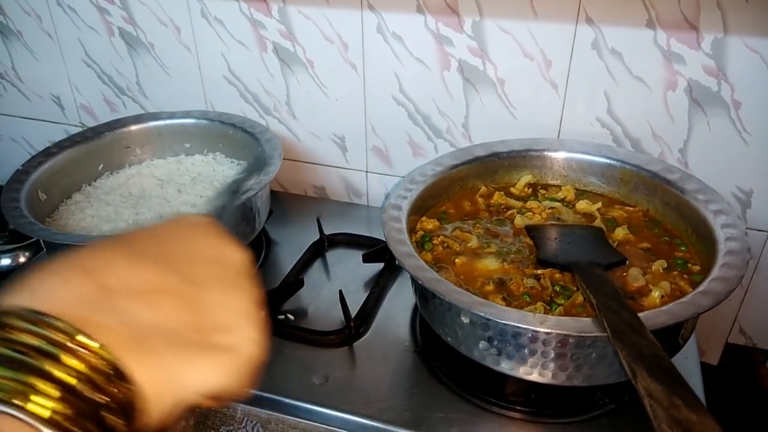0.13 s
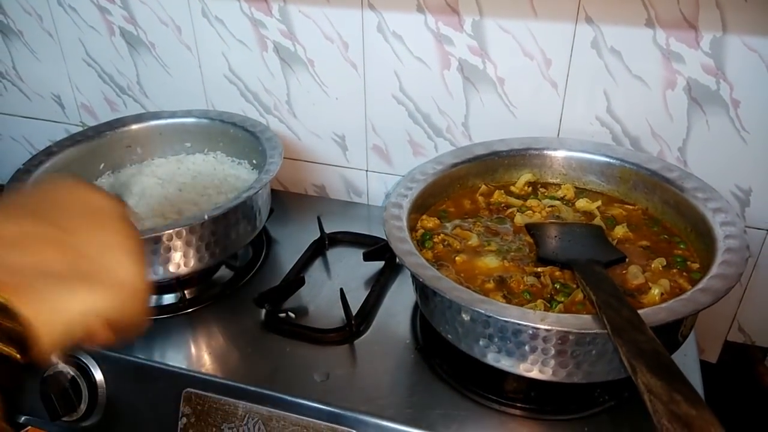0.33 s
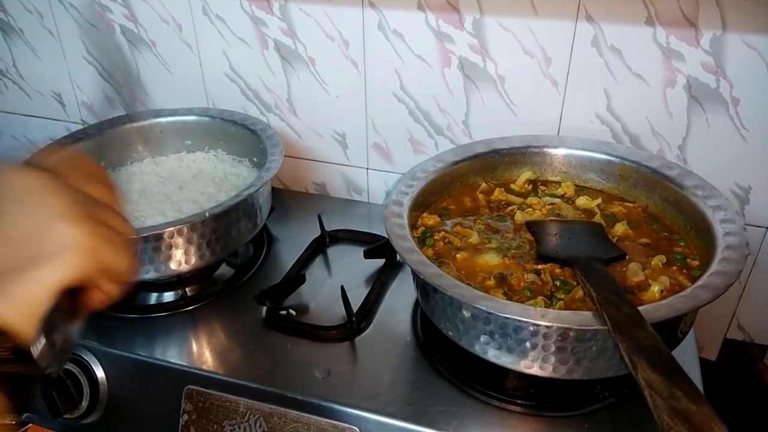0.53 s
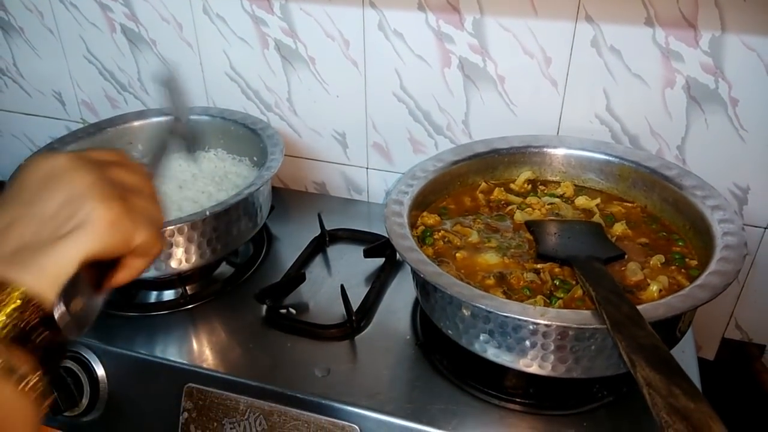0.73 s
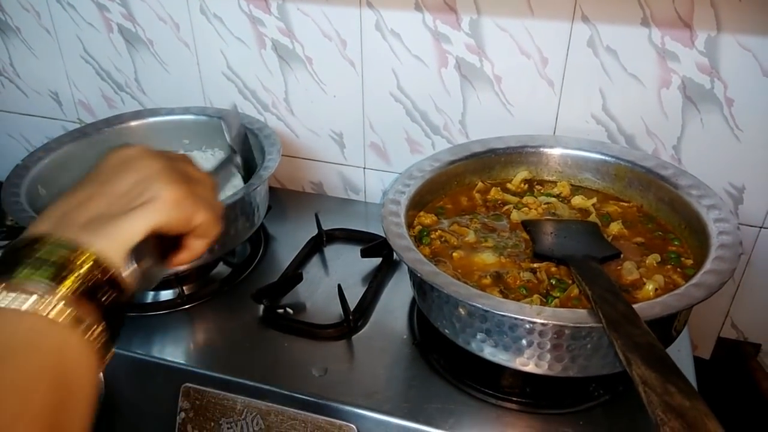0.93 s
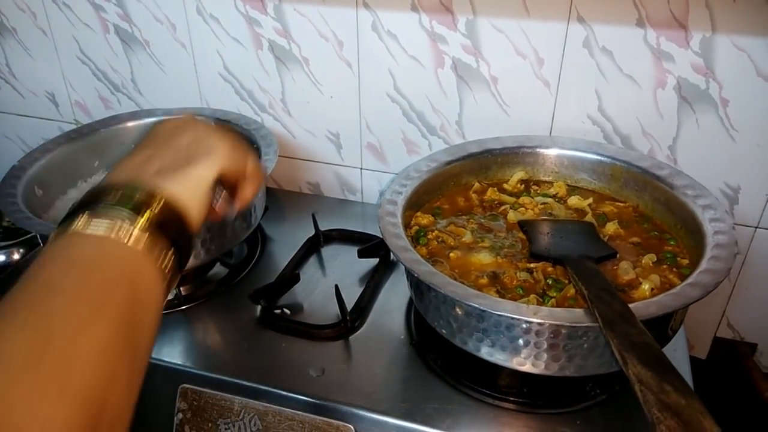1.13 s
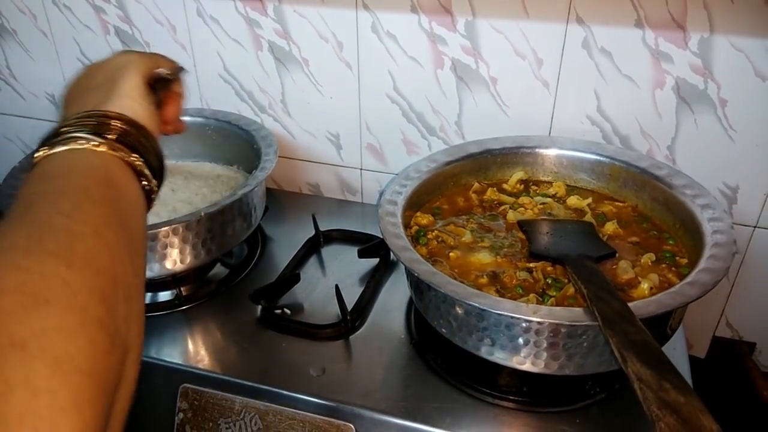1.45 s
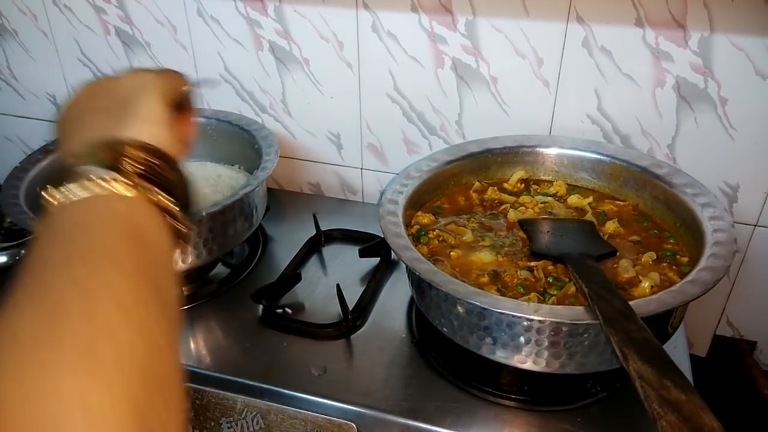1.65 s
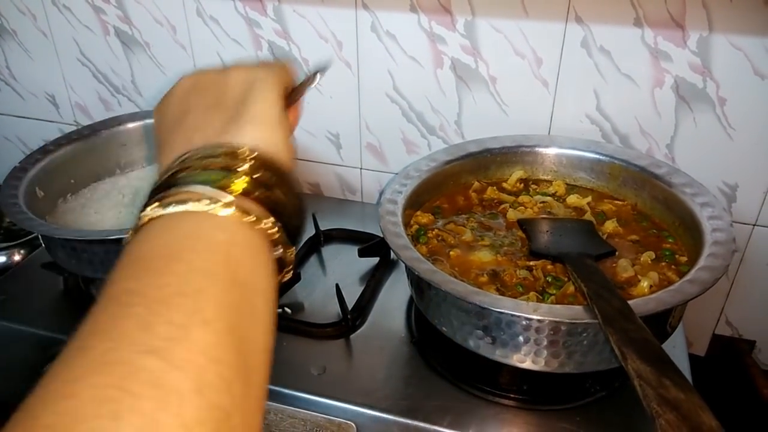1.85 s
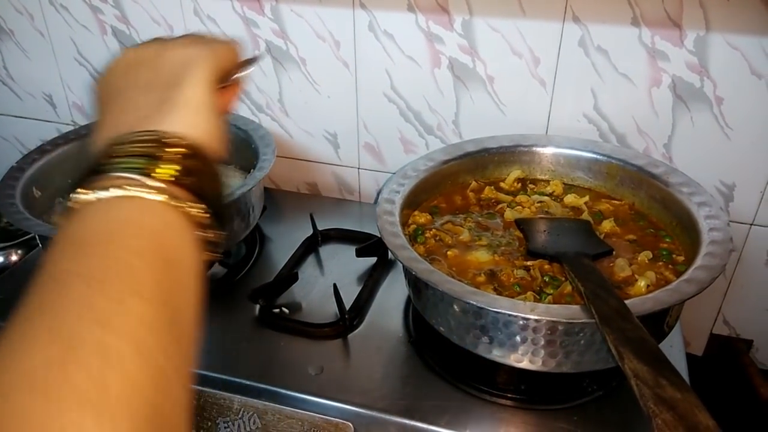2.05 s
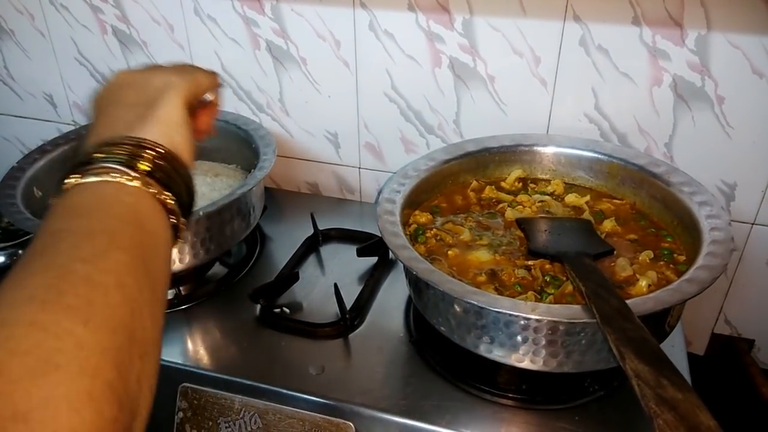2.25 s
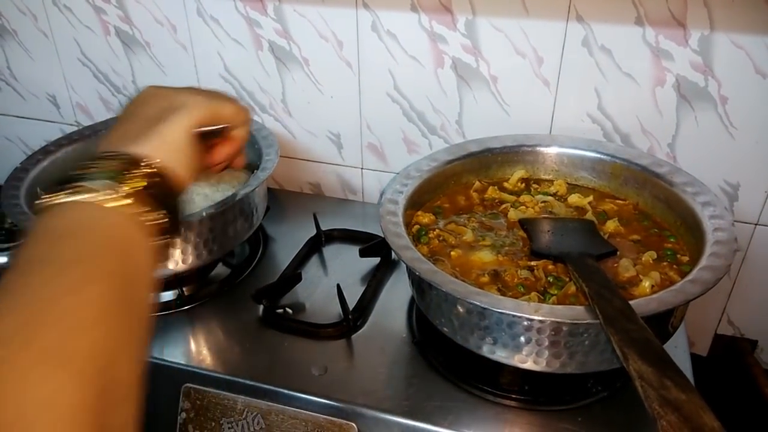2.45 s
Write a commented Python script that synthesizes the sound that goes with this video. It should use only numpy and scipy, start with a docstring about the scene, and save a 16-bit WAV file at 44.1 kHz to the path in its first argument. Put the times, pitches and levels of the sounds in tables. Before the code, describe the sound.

Close stereo pickup of a steel spoon striking and scraping a rice pot on a stove, the wall singing briefly, with soft hiss on the right and a short, bright tiled-room tail.

```python
"""In a tiled kitchen, a metal spoon stirs cooked rice in a steel pot on a stove, heard close up.
It knocks on the pot (bursts of decaying modes), scrapes through the rice along the wall (random
slips driving resonances) and now and then makes the wall sing (swelling, wavering tones).
Hollow groans are narrow noise bands, and bangles clink briefly near the start. A hiss on the right,
faint room noise and a faint whistle lie behind; decaying noise gives the tiles' short tail."""
import sys
import numpy as np
from scipy import signal
from scipy.fft import rfft, irfft
from scipy.io import wavfile
from scipy.ndimage import uniform_filter1d

SR = 44100
rng = np.random.default_rng(int(sys.argv[2]) if len(sys.argv) > 2 else 0)


def wav_out(sig):
    """Save sig, one row per channel (or a flat mono array), as 16-bit PCM at SR to the path in sys.argv[1]."""
    wavfile.write(sys.argv[1], SR, np.round(np.clip(np.atleast_2d(sig).T, -1, 1) * 32767).astype(np.int16))


N = 114660  # length in samples


def amp(db):
    """Level law: decibels become an amplitude ratio."""
    return 10 ** (np.asarray(db) / 20)


def unit(x):
    """Normalization: the signal is scaled to rms 1."""
    return x / np.sqrt(np.mean(x ** 2) + 1e-20)


def read(points, hz):
    """Logarithmic frequency scale: a table is interpolated evenly in log frequency."""
    f, value = np.transpose(points)
    return np.interp(np.log(hz + 1), np.log(f + 1), value)


def add(mix, start_s, sound):
    """Superposition: a sound is added to the mix from its start time."""
    part = mix[:, round(start_s * SR):][:, :sound.shape[1]]
    part += sound[:, :part.shape[1]]


def drift(seconds):
    """Low-pass noise: a Gaussian filter leaves a slow random wander of rms 1."""
    f = np.fft.rfftfreq(N, 1 / SR)
    return unit(irfft(rfft(rng.standard_normal(N)) * np.exp(-(f * seconds) ** 2), N))


def rising(sound, seconds):
    """Exponential build-up: the start is softened with this time constant."""
    return sound * (1 - np.exp(-np.arange(sound.shape[1]) / SR / seconds))


# Correlation of the two channels' noise. Each row: frequency in Hz, correlation from 0 to 1.
LIKENESS = [(100, 0.9), (300, 0.86), (700, 0.44), (1500, 0.11), (3000, 0)]


def noise(size=N):
    """Interchannel coherence: white stereo noise shares its bass and differs in its treble."""
    left, other = rfft(rng.standard_normal((2, size)))
    same = np.clip(read(LIKENESS, np.fft.rfftfreq(size, 1 / SR)), -1, 1)
    right = same * left + np.sqrt(1 - same ** 2) * other
    return irfft([left, right], size)


def steady(colour):
    """Spectral shaping: white stereo noise is filtered to a colour and scaled to rms 1."""
    gain = amp(read(colour, np.fft.rfftfreq(N, 1 / SR)))
    return unit(irfft(rfft(noise()) * gain, N))


PATCH_HZ, PATCH_S = 220, 0.027  # smoothing lengths of the random gain in frequency and time


def patchy(x, depth_db):
    """Time-varying filtering: a smooth random gain favours now some pitches, now others."""
    z = signal.stft(x, SR, nperseg=512, noverlap=384)[2]
    field = rng.standard_normal(z.shape[1:])
    bins = max(1, round(PATCH_HZ * 512 / SR))
    frames = max(1, round(PATCH_S * SR / 128))
    for _ in range(2):
        field = uniform_filter1d(uniform_filter1d(field, bins, 0), frames, 1)
    gain = amp(depth_db * unit(field))
    return signal.istft(z * gain, SR, nperseg=512, noverlap=384)[1][:, :N]


def fuzzy_note(curve, width_hz):
    """Modulated carrier: a gliding tone times slow complex noise is a narrow moving band."""
    t = np.arange(N) / SR
    s, hz, db = np.transpose(curve)
    carrier = np.exp(2j * np.pi * np.cumsum(np.interp(t, s, hz)) / SR)
    wobble = drift(2 / width_hz) + 1j * drift(2 / width_hz)
    sounding = (t >= s[0]) * (t <= s[-1])
    return (carrier * wobble).real * amp(np.interp(t, s, db)) * sounding


# Stereo balance of the pot. Each row: frequency in Hz, left minus right level in dB.
BALANCE_DB = [(200, -1), (600, 1.36), (1400, -2), (2400, -2), (4000, -5), (5800, 0.07), (7200, -9),
              (8500, -7), (10000, -16), (12000, -11), (15000, -2)]


def sides(hz):
    """Level-difference panning: each frequency gets a left and a right gain of constant power."""
    gain = amp(np.array([[.5], [-.5]]) * read(BALANCE_DB, hz))
    return gain / np.sqrt(np.mean(gain ** 2, 0))


# Clear modes of the pot wall. Each entry: frequency in Hz.
POT_HZ = [1482, 1502, 1572, 1904, 2426, 2462, 2957, 3275, 3342, 3414, 3643, 3745, 4061, 4512, 4568, 5111,
          5244, 5610, 5760, 5960, 6330, 6727]
# A crowd of higher wall modes lies between these bounds.
UPPER_LOW_HZ, UPPER_HIGH_HZ = 6547, 11610


def wall_hz(count=22):
    """Modal density: the clear wall modes are joined by an unevenly spaced crowd above."""
    k = np.arange(count)
    place = (k + .5 * np.sin(k * k)) / count
    return np.r_[POT_HZ, UPPER_LOW_HZ * (UPPER_HIGH_HZ / UPPER_LOW_HZ) ** place]


# Response of the pot between its modes. Each row: frequency in Hz, gain in dB.
VALLEYS = [(1000, -5), (1300, -5.5), (1750, -2), (2150, -8), (2750, -8), (3500, -7.5), (4250, -13.5),
           (4850, -7.5), (6000, -6.5), (9000, 1), (12500, -2)]
MODE_WIDTH_HZ = 48  # distance from a mode at which its peak weight falls to 1/e


def body(hz):
    """Resonance: the pot's gain is 1 at its modes and follows the valley table between them."""
    near = np.exp(-((hz[:, None] - wall_hz()) / MODE_WIDTH_HZ) ** 2).sum(1)
    near = np.minimum(near, 1)
    return near + (1 - near) * amp(read(VALLEYS, hz))


def ring(hz, db, t60):
    """Modal synthesis: decaying sinusoids sum, each in a random phase per channel."""
    t = np.arange(SR // 2) / SR
    phase = np.exp(2j * np.pi * rng.random((2, len(hz))))
    gain = sides(hz) * amp(db) / np.linalg.norm(amp(db)) * phase
    modes = np.exp((2j * np.pi * hz[:, None] - np.log(1000) / t60[:, None]) * t)
    return np.sqrt(2) * (gain @ modes).real


# Relative strengths of the clear modes, in the order of POT_HZ. Each entry: level in dB.
POT_DB = [6.5, 5.5, 3, -9.5, 1, -7, -3, -6, -5, -7, -12, -8, -8.5, -1, -3, -3.5, -9.5, -14, -16.5, -15,
          -28.5, -22]
# Decay of the wall modes before the spoon's damping. Each row: frequency in Hz, t60 in seconds.
POT_T60 = [(1500, 0.17), (2500, 0.23), (4000, 0.22), (8000, 0.067)]
UPPER_DB = -20.5  # relative strength of each mode in the upper crowd
LOW_MODES_HZ = 2000  # modes below this are weighted apart
RING_RISE_S = 0.0056
DAMPED_DB, DAMPING_S = -3, 0.088  # final extra loss and its time scale


def pot(low_db=0, spread_db=0):
    """Modal excitation: wall modes build up and decay, damped further by the spoon on the wall."""
    hz = wall_hz()
    db = np.r_[POT_DB, np.full(len(hz) - len(POT_HZ), UPPER_DB)]
    db = db + low_db * (hz < LOW_MODES_HZ)
    db = db + spread_db * rng.standard_normal(len(hz))
    modes = rising(ring(hz, db, read(POT_T60, hz)), RING_RISE_S)
    t = np.arange(modes.shape[1]) / SR
    return modes * amp(DAMPED_DB * (1 - np.exp(-(t / DAMPING_S) ** 2)))


def burst(colour, t60, in_pot=True, size=24576):
    """Statistical acoustics: dense modes are noise whose bands decay at their own rates."""
    hz, t, z = signal.stft(noise(size), SR, nperseg=128)
    decay = amp(-60 * t / read(t60, hz)[:, None])
    dying = signal.istft(z * decay, SR, nperseg=128)[1]
    hz = np.fft.rfftfreq(size, 1 / SR)
    resonance = body(hz) * sides(hz) if in_pot else 1
    gain = unit(amp(read(colour, hz)) * resonance)
    # the folded cepstrum gives a minimum-phase filter, which cannot sound before the strike
    cepstrum = 2 * irfft(np.log(gain))[..., :size // 2]
    causal = np.exp(rfft(cepstrum * np.r_[.5, np.ones(size // 2 - 1)], size))
    return irfft(rfft(dying) * causal, size)


def through(drive, response):
    """Convolution: a drive excites a linear response scaled to unit energy per channel on average."""
    response = response / np.sqrt(np.sum(response ** 2) / 2)
    return signal.fftconvolve(np.atleast_2d(drive), response, axes=1)[:, :N]


# Colour of the hiss. Each row: frequency in Hz, relative density in dB per Hz.
HISS = [(900, -35.5), (1700, -9), (2100, 2), (2500, -3), (3100, 0.5), (5500, -4.5), (9800, 1.5),
        (12000, -3.5), (13500, -14), (16000, -8)]
# Course of the hiss. Each row: time in seconds, level before the left channel's cut in dB.
HISS_LEVEL = [(0, -50), (.3, -52), (1.4, -49), (1.7, -54.5), (1.901, -49.5), (2.45, -52.5), (2.6, -51.5)]
HISS_LEFT_DB, HISS_PATCH_DB = -22.5, 1.6  # left relative to right; rms of the patchy gain


def hiss():
    """Broadband noise: a hiss on the right, with slow level changes and a slightly patchy colour."""
    level = amp(np.interp(np.arange(N) / SR, *np.transpose(HISS_LEVEL)))
    return level * patchy(steady(HISS), HISS_PATCH_DB) * amp([[HISS_LEFT_DB], [0]])


# Colour of the room noise. Each row: frequency in Hz, relative density in dB per Hz.
ROOM_NOISE = [(25, -16.5), (70, -32), (150, 3.5), (300, 0.5), (600, -2.5), (1000, 0), (2500, -16),
              (6000, -4.5), (8000, -28), (16000, -17.5)]


def room_noise():
    """Stationary noise: a constant faint background at -68 dB."""
    return amp(-68) * steady(ROOM_NOISE)


# Glide of the whistle. Each row: time in seconds, pitch in Hz, level in dB.
WHISTLE = [(0, 957, -60.5), (.13, 1020, -67.5), (.16, 1020, -95)]


def whistle():
    """Narrow-band noise: a faint whistle 85 Hz wide glides up and fades."""
    return fuzzy_note(WHISTLE, 85)


# Decay of the kitchen. Each row: frequency in Hz, t60 in seconds.
KITCHEN_T60 = [(150, 0.23), (600, 0.32), (1500, 0.29), (5000, 0.31), (14000, 0.35)]


def kitchen_tail(near):
    """Reverberation: near sounds excite a diffuse decaying response of the tiled kitchen."""
    colour = [(100, 1.0), (3000, 5.5), (15000, -3)]  # Hz, relative dB
    response = rising(burst(colour, KITCHEN_T60, in_pot=False), 0.0047)
    return amp(-11.5) * through(near, response)


# Colour of a sharp contact. Each row: frequency in Hz, relative density in dB per Hz.
CRACK = [(550, -20), (1100, -8), (4500, -9.5), (9000, 8), (12000, 5), (15500, -3.5)]
# Decay of light contacts, also of grit and rub. Each row: frequency in Hz, t60 in seconds.
TICK_T60 = [(3000, 0.14), (9000, 0.1), (15000, 0.14)]
# Clinks of the bangles. Each row: start in seconds, level in dB.
BANGLES = [(0.155, -42), (0.174, -48)]


def bangles():
    """Impact excitation: bangles touch in clinks of bright noise whose bands decay."""
    out = np.zeros((2, N))
    for start_s, db in BANGLES:
        add(out, start_s, amp(db) * burst(CRACK, TICK_T60))
    return out


# Groans, one list per groan. Each row: time in seconds, pitch in Hz, level in dB.
HOLLOWS = [
    [(.74, 469, -64), (.8, 437.4, -53.5), (.93, 422.7, -49), (.97, 367, -49), (1.03, 339.4, -49),
     (1.11, 326, -60.5)],
    [(.68, 992, -57), (.745, 804, -48.5), (.8, 1110, -42), (.95, 1004, -59)],
    [(1.32, 520, -38.5), (1.335, 521, -34.5), (1.37, 484, -56), (1.44, 424.6, -55.5), (1.5, 410, -78.5)],
    [(1.942, 433, -44), (1.965, 326, -43.5), (2.01, 208, -58)],
    [(2.02, 500, -45.5), (2.08, 501, -45.5), (2.11, 502, -52)],
    [(2.24, 714, -60.5), (2.32, 667, -51), (2.37, 670, -85.5)],
]


def hollow_groans():
    """Narrow-band noise: the spoon pushing rice groans in gliding bands 114 Hz wide."""
    return sum(fuzzy_note(curve, 114) for curve in HOLLOWS)


# Singing of the wall under the spoon's edge. Each row: time of the peak in seconds, Gaussian rise in
# seconds, Gaussian fall in seconds, mean pitch in Hz, peak level before the left channel's cut in dB.
SINGS = [(0.702, 0.004, 0.044, 1497, -36.5), (0.966, 0.031, 0.044, 1487, -31.5),
         (1.281, 0.12, 0.024, 1497, -37), (1.34, 0.004, 0.027, 1500, -18),
         (1.963, 0.013, 0.015, 1496, -14.5), (2.04, 0.01, 0.02, 1490, -24.5),
         (2.061, 0.013, 0.018, 1483, -21.5), (2.079, 0.0018, .022, 1480, -22.5),
         (2.154, 0.013, 0.012, 1478, -25.5), (2.355, 0.013, 0.026, 1500, -43.5)]
SING_WAVER_HZ = 12.92  # rms wander of the pitch
SING_LEFT_DB, SING_LAG_TURNS = -0.5, 0.18  # the left is softer and lags by this part of a cycle


def singing():
    """Stick-slip: friction pumps the lowest wall mode, heard as brief wavering tones."""
    t, out = np.arange(N) / SR, np.zeros((2, N))
    for peak_s, rise, fall, hz, db in SINGS:
        swell = np.exp(-((t - peak_s) / np.where(t < peak_s, rise, fall)) ** 2)
        turns = np.cumsum(hz + SING_WAVER_HZ * drift(0.014)) / SR
        turns = turns + np.array([[-SING_LAG_TURNS], [0]])
        out += amp(db) * swell * np.sqrt(2) * np.sin(2 * np.pi * turns)
    return out * amp([[SING_LEFT_DB], [0]])


GRAINS_PER_S, GRAIN_SPREAD_DB = 4000, 2.5  # mean rate of slips; scale of their random sizes


def grains():
    """Random impulses: tiny slips of steel over steel and rice have chance times, signs and sizes."""
    size = amp(GRAIN_SPREAD_DB * np.minimum(rng.exponential(1, N), 4))
    sign = rng.choice([-1, 1], N)
    slips = rng.random(N) < GRAINS_PER_S / SR
    return unit(size * sign * slips)


CONTACT_S, CONTACT_SPREAD_DB = .075, 5  # time from spot to spot; random change of each mode


def along_wall(drive, count=6):
    """Moving excitation: a sliding contact crossfades between spots with their own mode mixes."""
    place, out = np.arange(N) / SR / CONTACT_S, np.zeros((2, N))
    for spot in range(count):
        away = abs((place - spot) % count - count / 2)
        weight = np.cos(np.pi / 2 * np.minimum(away, 1))
        out += through(drive * weight, pot(-5.5, CONTACT_SPREAD_DB))
    return out


# Strokes through the rice, one list per stroke. Each row: time in seconds, then relative levels in dB
# of gritty treble, pot ring and low rub, each before its overall trim.
STROKES = [
    [(0.64, -38, -31.5, -37), (0.692, -36, -30.5, -47), (0.738, -32.5, -44, -30), (0.778, -42, -44, -39),
     (0.792, -29.5, -41, -43), (0.884, -31.5, -32.5, -35), (0.956, -27.5, -20, -39),
     (1.02, -29.5, -28.5, -34), (1.06, -37, -46, -35), (1.126, -42.5, -40, -37), (1.242, -38, -34, -36.5),
     (1.305, -58, -37.5, -63)],
    [(1.375, -60, -27, -33.5), (1.41, -38, -24.5, -31), (1.44, -53, -46, -40), (1.48, -72, -75.5, -60)],
    [(1.98, -40, -32, -39), (2.06, -54, -28, -39.5), (2.11, -62, -36, -55)],
    [(2.19, -38.5, -43, -47), (2.212, -31.5, -52, -39), (2.235, -48, -46, -49), (2.25, -29, -39, -62),
     (2.28, -31.5, -38.5, -48.5), (2.355, -37, -43.5, -47.5), (2.385, -73, -59, -79)],
]
# Colour of the grit. Each row: frequency in Hz, relative density in dB per Hz.
GRIT = [(300, -57.5), (900, -26), (1300, -3.5), (1750, 2.5), (2600, 5.5), (3600, 2.5), (4150, 1.5),
        (5500, 6), (7000, 2), (9500, 1.5), (12000, -6.5), (13500, -8.5), (16000, -13)]
# Colour of the low rub. Each row: frequency in Hz, relative density in dB per Hz.
RUB = [(30, -45), (130, -19), (250, -37), (400, -7.5), (600, 0.5), (800, 12.5), (1100, 3), (1600, 10),
       (2400, -22.5)]
GRIT_DB, SCRAPE_RING_DB, RUB_DB = -2, -9.5, -4.5  # overall trims
JUDDER_DB, JUDDER_S = 1.47, 0.027  # rms and time scale of the level's wander
STROKE_FADE_S, PATCH_DB = 0.007, 3.5  # fade beyond each end; rms of the patchy gain


def scrapes():
    """Friction excitation: juddering strokes of random slips drive grit, wall modes and a low rub."""
    t, level = np.arange(N) / SR, np.zeros((3, N))
    for stroke in STROKES:
        s, *columns = np.transpose(stroke)
        gate = np.clip(1 + np.minimum(t - s[0], s[-1] - t) / STROKE_FADE_S, 0, 1)
        level += gate * amp([np.interp(t, s, db) for db in columns])
    judder = unit(amp(JUDDER_DB * drift(JUDDER_S)))
    grit_drive, wall_drive, rub_drive = level * judder * grains()
    grit = amp(GRIT_DB) * through(grit_drive, burst(GRIT, TICK_T60))
    rub = amp(RUB_DB) * through(rub_drive, burst(RUB, TICK_T60))
    wall = amp(SCRAPE_RING_DB) * along_wall(wall_drive)
    return patchy(grit + rub + wall, PATCH_DB)


# Knocks of spoon on pot. Each row: start in seconds, then levels in dB of crack, tick, clang and ring,
# the relative weight of wall modes below LOW_MODES_HZ in dB, and the thud's level in dB.
KNOCKS = [(.4860, -26, -21.5, -25.5, -23.5, -7, -45), (0.5988, -27, -28.5, -22.5, -39, 0, -45),
          (0.7251, -39, -35.5, -29.5, -28.5, 6, -47.5), (0.7872, -27, -32.5, -29, -52, -21, -48),
          (.9506, -32, -49, -27, -34, 33, -28), (1.186, -32, -42.5, -36, -45, -10, -55),
          (1.2343, -33, -41, -33, -38, -3, -53), (1.3220, -23, -31.5, -18, -13, -1.5, -28.5),
          (1.941, -12.5, -18.5, -21.5, -21, -8.5, -22.5), (2.0310, -20, -32.5, -29, -47, 10, -26),
          (2.0530, -29, -38.5, -33, -34, -0.5, -31), (2.0732, -16.5, -32, -31, -32, 1, -33.5),
          (2.1250, -19, -32, -28, -42, -3, -24), (2.1319, -22, -24, -18, -14, -4.5, -24)]
# Colours of tick, clang and thud. Each row: frequency in Hz, relative density in dB per Hz.
TICK = [(1500, -48), (4000, -5.5), (6000, -1.5), (8000, 1), (10000, -1.5), (12000, -2), (13500, -7.5),
        (16000, -28)]
CLANG = [(600, -30), (950, -5.5), (1300, -3.5), (1700, -4.5), (2150, -5), (2500, 5), (3300, -4),
         (4200, -0.5), (5400, 3), (7000, -6), (11000, -13), (15000, -21)]
THUD = [(30, -54.5), (110, -25.5), (220, -12), (450, -2), (800, 9.5), (1150, -2), (1700, 7.5),
        (3000, -21.5)]
# Decays of clang and thud. Each row: frequency in Hz, t60 in seconds.
CLANG_T60 = [(1500, 0.22), (5000, 0.13), (12000, 0.11)]
THUD_T60 = [(60, 0.26), (250, 0.24), (800, 0.22), (2000, 0.05)]
# Modes of the spoon. Each row: frequency in Hz, relative level in dB, t60 in seconds.
SPOON = [(3050, 2.5, 0.022), (8060, -3, 0.089), (9860, 5.5, 0.067), (11110, -6, 0.06)]
# Modes of the pot rocking on its grate. Each row: frequency in Hz, relative level in dB, t60 in seconds.
GRATE = [(242, 8.5, 0.17), (378.7, 0.5, 0.18)]
CRACK_S = 0.0016  # time constant of the crack's extra decay
TICK_RISE_S, CLANG_RISE_S, GRATE_RISE_S = 0.00038, .0015, 0.026
SPOON_DB, GRATE_DB = 1.5, -37  # spoon ring relative to the tick; level of the grate


def knocks():
    """Impact excitation: each blow sums a crack, tick, clang, thud and ringing of pot and spoon."""
    out = np.zeros((2, N))
    for start_s, crack_db, tick_db, clang_db, ring_db, low_db, thud_db in KNOCKS:
        crack = burst(CRACK, TICK_T60)
        crack = crack * np.exp(-np.arange(crack.shape[1]) / SR / CRACK_S)
        tick = rising(burst(TICK, TICK_T60), TICK_RISE_S)
        clang = rising(burst(CLANG, CLANG_T60), CLANG_RISE_S)
        thud = burst(THUD, THUD_T60)
        spoon = rising(ring(*np.transpose(SPOON)), TICK_RISE_S)
        add(out, start_s, amp(crack_db) * crack + amp(tick_db) * tick)
        add(out, start_s, amp(clang_db) * clang + amp(thud_db) * thud)
        add(out, start_s, amp(ring_db) * pot(low_db) + amp(tick_db + SPOON_DB) * spoon)
    # the pot rocks on its grate at the first knock
    grate = rising(ring(*np.transpose(GRATE)), GRATE_RISE_S)
    add(out, KNOCKS[0][0], amp(GRATE_DB) * grate)
    return out


def scene():
    """Superposition: the background, the stirring with its bangles, and their reverberation add."""
    background = hiss() + room_noise() + whistle()
    near = bangles() + hollow_groans() + singing() + scrapes() + knocks()
    return background + near + kitchen_tail(near)


def record(dry):
    """Band limitation: a linear-phase low-pass filter removes the top above 15.9 kHz."""
    low_pass = signal.firwin(401, 15900, window=("kaiser", 8), fs=SR)
    return signal.oaconvolve(dry, low_pass[None], "same")


dry = scene()
out = record(dry)
wav_out(out)
```